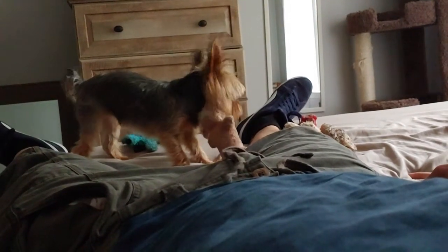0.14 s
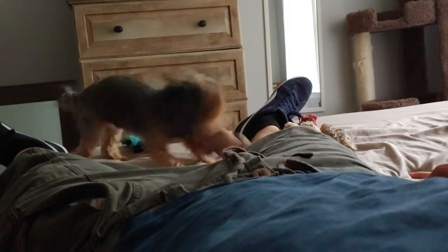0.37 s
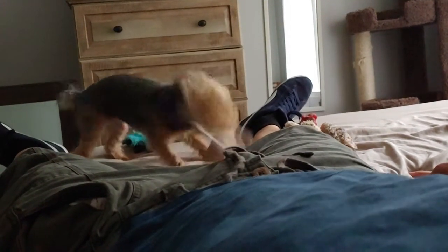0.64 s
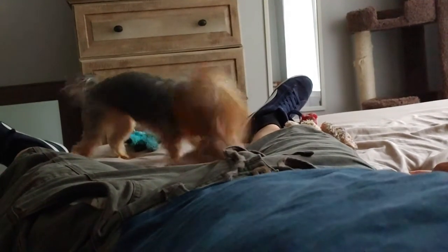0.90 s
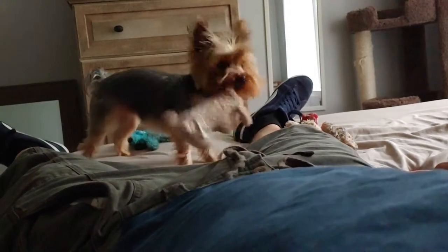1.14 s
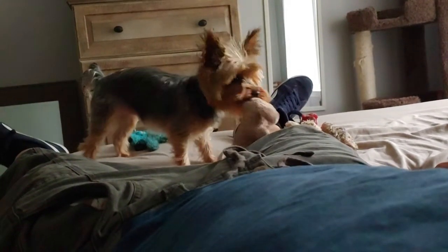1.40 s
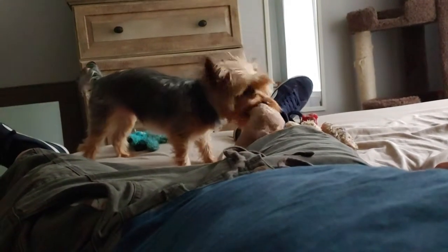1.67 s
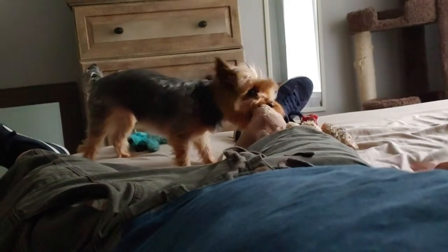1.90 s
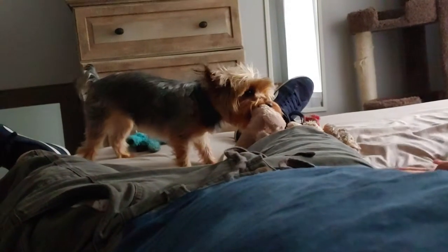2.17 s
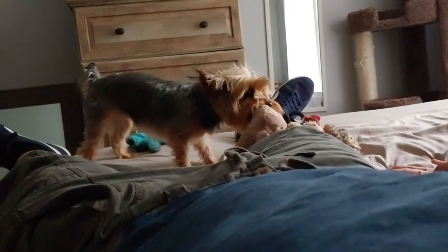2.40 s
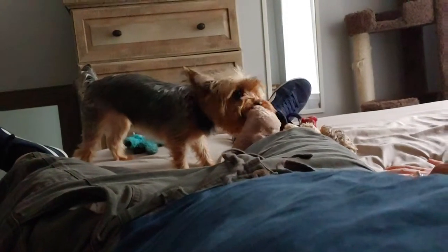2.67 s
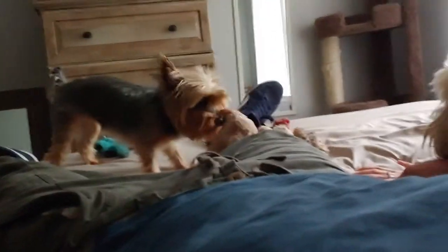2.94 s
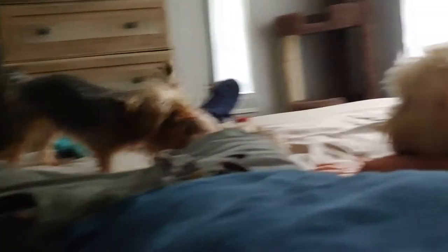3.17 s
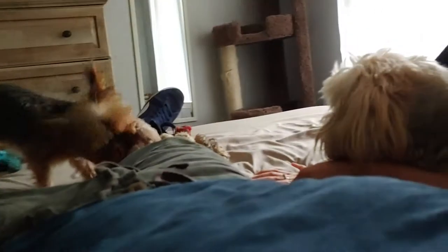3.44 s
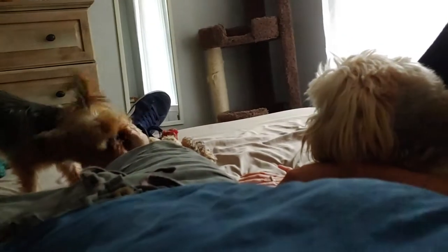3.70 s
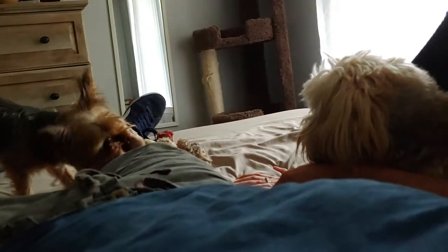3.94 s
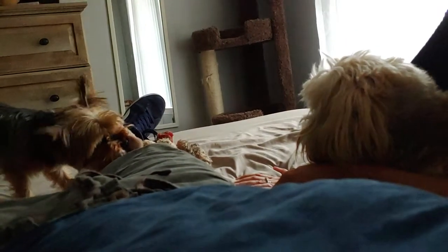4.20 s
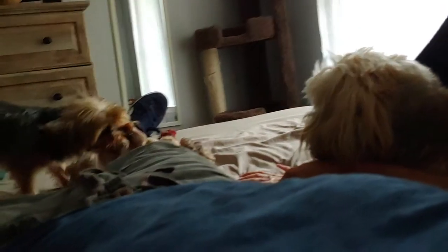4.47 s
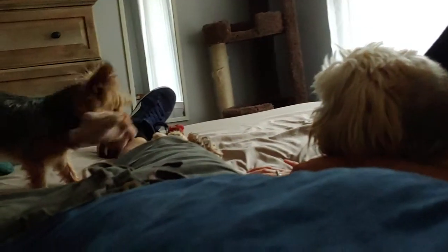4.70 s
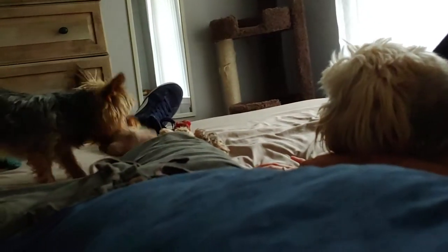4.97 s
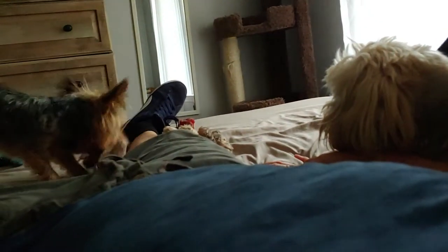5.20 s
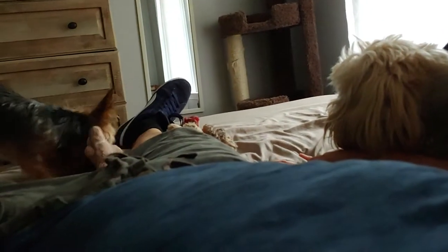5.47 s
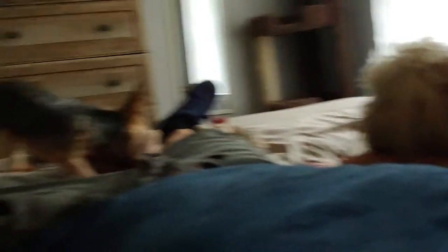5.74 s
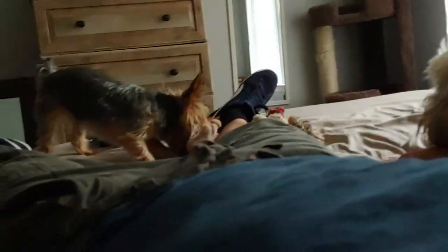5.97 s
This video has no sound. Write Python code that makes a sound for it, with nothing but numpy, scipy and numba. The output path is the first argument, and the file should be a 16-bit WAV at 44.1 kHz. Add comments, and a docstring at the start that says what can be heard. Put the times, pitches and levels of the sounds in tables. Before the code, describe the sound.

Cloth rustles and mattress thuds build to one heavy knock, then a little dog growls through a toy in its jaws in a quiet bedroom.

```python
"""A quiet bedroom with a faint chirping, perhaps a bird beyond the window; a small dog on a bed growls briefly.
Cloth rustles, paws and toy thud and the mattress sways, up to the heaviest thuds at 2.2 s. Then it shakes and
tugs a plush toy, with growls to 4.1 s and 4.7-6.1 s and two tooth clicks, at 2.6 and 4.3 s. Uneven throat pulses
ring a muffled mouth, noise bands make cloth, breath and room tone, decaying modes make thuds and clicks."""
import sys
import numpy as np
from scipy import signal
from scipy.fft import rfft, irfft
from scipy.io import wavfile
from scipy.ndimage import uniform_filter1d
from numba import njit

SR = 44100
rng = np.random.default_rng(int(sys.argv[2]) if len(sys.argv) > 2 else 0)


def output_pcm(signal):
    """Save a mono or channel-first signal as 16-bit PCM at the path in sys.argv[1].

    Samples are clipped to [-1, 1] before scaling.
    """
    pcm = np.clip(np.atleast_2d(signal).T, -1, 1) * 32767
    wavfile.write(sys.argv[1], SR, np.round(pcm).astype(np.int16))


def volts(x):
    """Linear amplitude factor 10**(x/20) for a level x in dB, scalar or array-like."""
    e = np.asarray(x, float) / 20
    return 10 ** e


N = 269451
T = np.arange(N) / SR

# Growls, one curve each. Each row: time in seconds, chest effort in dB, jaw opening (0 clamped on the toy, 1 wide).
GROWLS = [
    [(.374, -58, .4), (.39, -51, .1), (.46, -46, .15), (.49, -44, .65), (.54, -47, .65), (.6, -55, .7),
     (.635, -49, .55), (.71, -58, .7)],
    [(2.297, -51, .6), (2.313, -42.5, .85), (2.455, -33, .75), (2.6, -34, .85), (2.841, -36, .85),
     (2.971, -43, .95), (3.1, -90, 1)],
    [(3.247, -48, .4), (3.255, -42, .7), (3.317, -41, .6), (3.445, -54.5, .95), (3.56, -90, 1)],
    [(3.605, -72, .6), (3.625, -59, .85), (3.671, -46, .65), (3.821, -39, .7), (4.051, -48, .7),
     (4.085, -60, .95), (4.15, -95, .6)],
    [(4.72, -58.5, .7), (4.75, -48.5, .55), (4.978, -36, .68), (5.118, -40, .25), (5.172, -46, .4),
     (5.19, -37, .2)],
    [(5.197, -50, .6), (5.21, -41.5, .9), (5.27, -41, .85), (5.353, -35.5, .7), (5.623, -33, .7),
     (5.739, -38.5, .6), (5.811, -62, .85), (5.93, -66, .85)],
    [(5.958, -71, .9), (5.972, -41.5, .7), (6.08, -38, .72), (6.11, -41, .8)],
]
GROWL_ENDS_S = [s for g in GROWLS for s in (g[0][0], g[-1][0])]


def unit(x):
    """Scaled to rms 1."""
    return x / np.sqrt(np.mean(x ** 2))


def columns(tables, rest):
    """Curves of several bursts on the sample grid; in the pauses the columns take the rest values."""
    rows = [(0, *rest)]
    for table in tables:
        if table[0][0] - rows[-1][0] > .026:
            rows += [(rows[-1][0] + .02, *rest), (table[0][0] - .004, *rest)]
        rows += table
    s, *cols = np.transpose(rows + [(rows[-1][0] + .02, *rest)])
    return [np.interp(T, s, c) for c in cols]


def swells(rows):
    """Gain curves that climb to a peak and die away, each straight in dB."""
    return [volts(db - 60 * np.where(T < s, (s - T) / rise, (T - s) / fall)) for s, db, rise, fall in rows]


def walk(rate):
    """Random levels held 1 / rate s and slewed twice; rms 1 over the whole length."""
    k = int(SR / rate)
    held = np.repeat(rng.standard_normal(N // k + 1), k)
    return unit(uniform_filter1d(uniform_filter1d(held, k), k)[:N])


def colour(x, points):
    """Noise shaped by (Hz, dB) points, straight in log frequency."""
    hz, db = np.transpose(points)
    f = np.fft.rfftfreq(x.shape[-1], 1 / SR) + 1
    return irfft(rfft(x) * volts(np.interp(np.log(f), np.log(hz), db)), x.shape[-1])


def between(x, low_hz, high_hz):
    """Steep zero-phase band limits that keep the shape of a pulse, rms 1."""
    sos = signal.butter(2, [low_hz, high_hz], "band", fs=SR, output="sos")
    return unit(signal.sosfiltfilt(sos, x))


@njit
def svf(x, hz, width):
    """Band-pass whose centre may move, gain 1 at the centre."""
    y, band, low = np.empty(len(x)), 0., 0.
    for i in range(len(x)):
        g, k = np.tan(np.pi * hz[i] / SR), width / hz[i]
        v = (band + g * (x[i] - low)) / (1 + g * (g + k))
        band, low, y[i] = 2 * v - band, low + 2 * g * v, k * v
    return y


def resonances(x, table):
    """Fixed resonances side by side."""
    return sum(volts(db) * svf(x, np.full(N, 1. * hz), 1. * width) for hz, width, db in table)


def ring(modes, secs):
    """Modes let go together from full deflection, peak 1."""
    t = np.arange(int(secs * SR)) / SR
    y = sum(volts(db) * np.cos(2 * np.pi * hz * t) * np.exp(-np.log(1000) * t / t60) for hz, db, t60 in modes)
    return y / np.abs(y).max()


def add(out, s, sound):
    """Mixes a short sound in at time s."""
    i = int(s * SR)
    out[..., i:i + sound.shape[-1]] += sound[..., :N - i]


def folds():
    """Slack vocal folds slap unevenly, and each opening lets out a puff: slap pulses and puff envelope."""
    # Nominal rate of the slaps in each growl, in Hz.
    pulse_hz = [240, 168, 150, 132, 155, 165, 155]
    period_scatter, period_drift, size_scatter_db = .15, .12, 3  # first two in log period
    chance = rng.standard_normal((3000, 3))
    # periods wander over a few cycles and also jump from one to the next
    drift = unit(uniform_filter1d(chance[:, 2], size=6))
    periods = np.exp(period_scatter * chance[:, 0] + period_drift * drift)
    rate_hz = np.interp(T, GROWL_ENDS_S, np.repeat(pulse_hz, 2))
    times = np.interp(np.cumsum(periods), np.cumsum(rate_hz) / SR, T)
    inside = times < T[-1]
    pulses = np.zeros(N)
    pulses[(times[inside] * SR).astype(int)] = volts(size_scatter_db * chance[inside, 1])
    # a growl starts with a hard release of the closed folds
    pulses[[int((g[0][0] + .011) * SR) for g in GROWLS]] = volts(3.5)
    pulses = pulses / np.sqrt(rate_hz)  # faster slaps are smaller: equal effort, equal power
    puff = unit(signal.lfilter([1], [1, -np.exp(-1 / (0.0022 * SR))], pulses))
    return unit(pulses), puff


def growl(pulses, puff):
    """Slaps and turbulent air ring throat, mouth and teeth; the toy in the jaws muffles all above the chest."""
    # Airway of each growl. Each row: throat resonance in Hz, palate resonance in Hz, palate against throat in dB,
    # mouth resonance in Hz at the start, and at the end.
    airways = [(255, 570, -3, 1420, 1520), (195, 655, -12, 1310, 1640), (195, 635, -10, 1550, 1950),
               (185, 590, -9, 1580, 1500), (170, 640, -9, 1450, 1530), (204, 640, -9, 1520, 1570),
               (188, 600, -8, 1450, 1520)]
    # Chest resonances. Each row: centre in Hz, width in Hz, level against the throat in dB.
    chest_modes = [(299.5, 23, -16), (514.4, 73, -15), (917, 250, -16.5)]
    # Cheek resonances. Each row: centre in Hz, width in Hz, level against the mouth resonance in dB.
    cheek_modes = [(1060, 240, -10), (2150, 280, -14.5)]
    # Teeth resonances. Each row: centre in Hz, width in Hz, level against the teeth gap in dB.
    teeth_modes = [(2940, 500, -5), (4080, 370, -11.5), (4890, 230, -9)]
    # The lip lifts and bares the teeth. Each row: widest at in seconds, rasp minus chest in dB,
    # rise and fall in seconds for 60 dB, teeth gap resonance in Hz.
    snarls = [(.49, -19, .08, .3, 3450), (2.47, -29, .1, .5, 3200), (2.575, -18, .2, .3, 3900),
              (2.74, -20, .1, .8, 3500), (2.965, -16, .15, .5, 4000), (3.29, -28, .15, .3, 3300),
              (3.43, -20, .3, .5, 4600), (3.73, -25, .4, .8, 3250), (4.04, -25, .6, 1, 3800),
              (5.24, -26, .15, 1, 3600), (5.35, -25, .4, .7, 3950), (5.6, -26, .6, .5, 3600)]
    mouth_open_db, mouth_shut_db = 0, -35  # against the chest
    covered_db, covered_hz = -28, 3400  # rasp through covered teeth, against the mouth
    waver, waver_per_s = .025, 14  # rms share by which the soft airway's resonances wander, how often
    air_share = .28

    chest_db, jaw = columns(GROWLS, (-100, .9))
    mouth_db = mouth_shut_db + (mouth_open_db - mouth_shut_db) * np.clip(jaw, 0, 1.2)
    air = puff * rng.standard_normal(N)
    source = pulses + air_share * air

    *back, first_hz, last_hz = np.transpose(airways)
    throat_hz, palate_hz, palate_db = (np.interp(T, GROWL_ENDS_S, np.repeat(c, 2)) for c in back)
    palate_hz = palate_hz * (1 + waver * walk(waver_per_s))
    mouth_hz = np.interp(T, GROWL_ENDS_S, np.ravel([first_hz, last_hz], "F"))
    mouth_hz = mouth_hz * (1 + waver * walk(waver_per_s))
    bared = np.array([volts(mouth_db + covered_db), *swells([r[:4] for r in snarls])])
    teeth_hz = np.array([covered_hz, *np.transpose(snarls)[4]]) @ bared / bared.sum(0)

    throat = svf(source, throat_hz, 123.0) + volts(palate_db) * svf(source, palate_hz, 130.0)
    chest = between(throat + resonances(source, chest_modes), 103, 880)
    mouth = between(svf(source, mouth_hz, 240.0) + resonances(source, cheek_modes), 633, 2150)
    rasp = 0.36 * pulses + air
    teeth = between(svf(rasp, teeth_hz, 660.0) + resonances(rasp, teeth_modes), 2570, 5070)
    return volts(chest_db) * (chest + volts(mouth_db) * mouth + bared.sum(0) * teeth)


def breath(puff):
    """Fluttering turbulent air through the nose, pulsed slightly by the folds."""
    # Each row: start in seconds, end in seconds, mean level in dB.
    breaths = [(2.32, 2.95, -72), (3.32, 3.43, -78), (3.66, 4.05, -80), (4.44, 4.45, -89),
               (4.74, 6.11, -76)]
    # Nose resonances. Each row: centre in Hz, width in Hz, relative level in dB.
    nose_modes = [(6660, 390, 4), (7800, 440, 1.5), (8360, 250, -13.5), (10700, 3000, -14.5),
                  (14300, 1500, -33)]
    rise_s, fall_s = .08, .28  # for 60 dB, outside start and end
    nose = between(resonances((1 + 0.28 * puff) * rng.standard_normal(N), nose_modes), 4400, 15500)
    flow = np.zeros(N)
    for start, end, db in breaths:
        outside = np.maximum(0, np.maximum((start - T) / rise_s, (T - end) / fall_s))
        flow += volts(db - 60 * outside)
    return flow * volts(2.2 * walk(14)) * nose


def dog():
    """Growl and breath share the folds; both reach the left microphone first."""
    lead_ms = .12
    pulses, puff = folds()
    voice = growl(pulses, puff) + breath(puff)
    return np.array([voice, np.roll(voice, int(lead_ms * SR / 1000))])


def rustle():
    """Fibres of dragged and shaken cloth slip in a dense crackle: a bright hiss and a duller scrape."""
    # Each row: loudest at in seconds, hiss in dB, rise and fall in seconds for 60 dB,
    # scrape centre in Hz, scrape minus hiss in dB.
    drag_rows = [(.505, -58, .15, .2, 1500, 9), (.655, -62, .2, .14, 950, 9),
                 (.735, -57.5, .03, .3, 1300, 8), (.861, -64, .02, .6, 950, 6),
                 (1.685, -78, .1, .8, 850, 25), (1.82, -62, .4, .2, 2900, 11),
                 (1.86, -58, .1, .4, 1000, 12), (2.036, -68.5, .25, .3, 930, 8),
                 (2.196, -45, .03, .32, 1000, 11), (5.95, -76, 1, 2, 2200, 0)]
    # Hiss spectrum. Each row: frequency in Hz, relative density in dB per Hz.
    hiss_points = [(2500, -17), (3500, -4), (4500, -8.8), (5800, -12.5), (7000, -6), (8500, -11.5),
                   (10000, -21), (11800, -24.5), (13000, -38), (15000, -46)]
    drags = np.array(swells([r[:4] for r in drag_rows])) + 1e-12
    scrapes = volts(np.transpose(drag_rows)[5])[:, None] * drags
    scrape_hz = np.transpose(drag_rows)[4] @ scrapes / scrapes.sum(0)
    # a wide source: each microphone hears its own fibres, slipping together
    fibres = rng.standard_normal((2, 2, N)) + 0.48 * rng.standard_normal((2, 1, N))
    fibres = fibres * volts(2.86 * walk(150) + 1.9 * walk(39.9))
    hiss = unit(colour(fibres[0], [(1700, -40), *hiss_points]))
    scrape = between([svf(ch, scrape_hz, 720.0) for ch in fibres[1]], 380, 3900)
    return drags.sum(0) * hiss + scrapes.sum(0) * scrape


def sway():
    """The mattress sways under the dog's weight: slow pressure as deep noise."""
    # Each row: deepest at in seconds, level in dB, rise and fall in seconds for 60 dB.
    sway_rows = [(.8, -45, 1, .6), (2.05, -51, .3, 1.5), (2.28, -38, .3, .5), (3.0, -64, 3, 1.5),
                 (4.0, -52, .6, .6), (5.9, -56, 1, 1)]
    rest_db = -80
    points = [(20, -25), (40, -3), (55, -3), (75, -5.5), (120, -34), (1000, -111)]  # Hz, dB
    rumble = unit(colour(rng.standard_normal(N), points))
    return (volts(rest_db) + sum(swells(sway_rows))) * rumble


def creases():
    """Bedding creases as the dog shifts: crackling low noise."""
    # Each row: loudest at in seconds, level in dB, rise and fall in seconds for 60 dB.
    crease_rows = [(.45, -56, .2, 1.5), (.9, -50, .5, .45), (1.24, -66, 1, .8), (1.7, -61, .5, 3),
                   (2.0, -53, .8, .6), (2.9, -65, 2, 1.5), (5.3, -67, 3, 6)]
    rest_db = -79
    points = [(60, -33), (130, 4.5), (250, -20), (550, -5.5), (900, -28.5), (3000, -47.5)]  # Hz, dB
    crackle = rng.standard_normal(N) * volts(4 * walk(60))
    return (volts(rest_db) + sum(swells(crease_rows))) * unit(colour(crackle, points))


def thuds():
    """A soft push of short contact; each row sets how deep into the mattress modes the thud reaches."""
    # Each row: time in seconds, push peak in dB, contact in ms, mattress ring against push in dB,
    # lowest mode fully reached in Hz.
    thud_rows = [(0.513, -30, 2.2, 0, 80), (0.7279, -36, 4.4, 20, 45), (0.75, -28, 2.2, -3, 45),
                 (.864, -37.5, 0.86, 7.5, 80), (0.9086, -28, 1.6, -4, 80), (.931, -32, 5.3, 8, 45),
                 (1.68, -34, 1.5, 6, 250), (1.712, -35, 1.6, 4, 150), (1.847, -26.5, 0.75, -2.5, 182),
                 (1.9703, -30, 1.33, -20, 300), (1.9786, -26.5, 1.8, -12, 150), (1.988, -31, 2.4, -2.5, 45),
                 (2.1845, -32, 1.5, 1, 200), (2.1961, -11.5, 2.65, 9.5, 45), (2.2041, -13, 1.85, -1, 150),
                 (2.233, -14.5, 2.3, -6, 150), (3.1993, -37, 0.75, -2, 300)]
    # Mattress modes. Each row: frequency in Hz, level in dB, t60 in seconds.
    mattress = [(55, -8, 0.37), (97.8, 1.5, .13), (127, -13.5, 0.3), (210, -6, 0.12), (287.5, -11, 0.064),
                (354.5, -17.5, 0.17), (425, -28, 0.083), (700, -17.5, .08), (1100, -26, .06)]
    # the air thins just ahead of each push
    dip_db, dip_contacts = -6, 1.5  # against the push, lead in contact lengths
    out = np.zeros(N)
    for s, db, contact_ms, ring_db, low_hz in thud_rows:
        push = np.hanning(max(int(contact_ms * SR / 1000), 8))
        modes = [(hz, g - 12 * max(np.log2(low_hz / hz), 0), t60) for hz, g, t60 in mattress]
        hit = np.convolve(push / push.sum(), ring(modes, .5)) * volts(ring_db)
        hit[:len(push)] += push
        add(out, s, volts(db) * hit)
        add(out, s - dip_contacts * contact_ms / 1000, -volts(db + dip_db) * push)
    return out


def clicks():
    """Teeth meet: hard enamel tick, a few milliseconds of ring; it reaches the right microphone first."""
    # Each row: time in seconds, peak in dB, left minus right in dB.
    click_rows = [(2.639, -27, -1), (4.2959, -28.5, -6.5)]
    # Tooth modes. Each row: frequency in Hz, level in dB, t60 in seconds.
    tooth = [(2100, 8.5, .013), (2200, -19.5, .011), (2710, 1, .011), (3390, -11, 0.021), (530, -21, 0.036)]
    out = np.zeros((2, N))
    onset = np.minimum(np.arange(int(.02 * SR)) / (0.0012 * SR), 1) ** 2
    tick = ring(tooth, .02) * onset
    tick /= np.abs(tick).max()
    for s, db, pan_db in click_rows:
        add(out[0], s + 0.00035, volts(db + pan_db / 2) * tick)
        add(out[1], s, volts(db - pan_db / 2) * tick)
    return out


def room(x):
    """A short diffuse tail that builds over the first reflections; long waves arrive alike at both microphones."""
    # Each row: band centre in Hz, t60 in seconds, level against the sound sent in, in dB.
    bands = [(150, 0.41, -19.5), (399, .25, 4), (1000, 0.23, 1.5), (2700, 0.14, 2.5), (7460, 0.17, 2.5)]
    t = np.arange(int(.4 * SR)) / SR
    tail = np.zeros((2, len(t)))
    for hz, t60, db in bands:
        mid, side = rng.standard_normal((2, len(t)))
        pair = mid + min(hz / 900, 1) * side * np.array([[1], [-1]])
        pair = colour(pair, [(hz / 4, -40), (hz / 1.6, 0), (hz * 1.6, 0), (hz * 4, -40)])
        pair *= np.exp(-np.log(1000) * t / t60) * np.minimum(t / 0.0074, 1) ** 2
        tail += volts(db) * pair / np.sqrt(np.mean(np.sum(pair ** 2, 1)) * SR / 2 / hz)
    return signal.fftconvolve(x, tail, axes=1)[:, :N]


def quiet():
    """The still room: a dull wavering noise, alike left and right only in the low middle."""
    # Each row: frequency in Hz, relative density in dB per Hz.
    points = [(40, 3.5), (60, 6), (120, -4), (220, 2.5), (400, -11), (600, -11), (1000, -17.5),
              (1800, -22.5), (2500, -30.5), (3300, -29.5), (5000, -36), (8000, -42.5), (12000, -41),
              (15000, -44.5)]
    mean_db = -68  # of left and right averaged
    mid, side = rng.standard_normal((2, N))
    side = colour(side, [(60, 5.5), (180, -7), (500, 3), (1200, 1)])
    pair = colour(mid + side * np.array([[1], [-1]]), points)
    return volts(mean_db + 0.66 * walk(2.5)) * pair / np.sqrt(np.mean(pair.mean(0) ** 2))


def chirps():
    """A faint thin wavering whistle in short peeps, perhaps a bird beyond the window."""
    # Each row: loudest at in seconds, peak in dB, rise and fall in seconds for 60 dB.
    peeps = [(.125, -84, .1, .15), (.16, -81, .1, .12), (.225, -83, .08, .12), (.405, -82, .05, .1)]
    centre_hz, waver_hz = 3200, 70
    hz = centre_hz + waver_hz * walk(60)
    return sum(swells(peeps)) * np.sin(2 * np.pi * np.cumsum(hz) / SR)


def scene():
    """Dog, cloth and bed in the room, over its quiet; thuds travel mostly through the bed and echo less."""
    voice, hits, ticks = dog(), thuds(), clicks()
    bed = rustle() + sway() + creases()
    echo = room(voice + volts(-6) * bed + volts(-9) * hits + volts(-15) * ticks)
    return voice + bed + hits + ticks + echo + quiet() + chirps()


def band_limit(x):
    """A steep low-pass at the top of the band."""
    return signal.sosfilt(signal.butter(12, 15700, fs=SR, output="sos"), x)


def record(dry):
    """The two microphones lose bass at different corners, so the left leads and is thinner down low."""
    # Bass corner of the left and right microphone, in Hz.
    port_hz = (111, 22)
    left_db = 0.06  # the left microphone is a little more sensitive
    ports = [signal.lfilter(*signal.butter(1, hz, "high", fs=SR), ch) for hz, ch in zip(port_hz, dry)]
    return band_limit(np.array(ports) * volts([[left_db], [0]]))


dry = scene()
out = record(dry)
output_pcm(out)
```